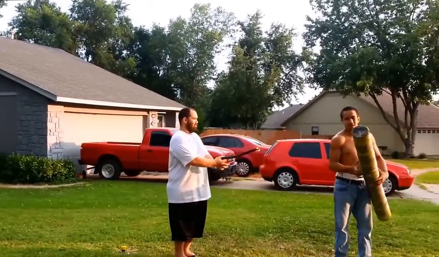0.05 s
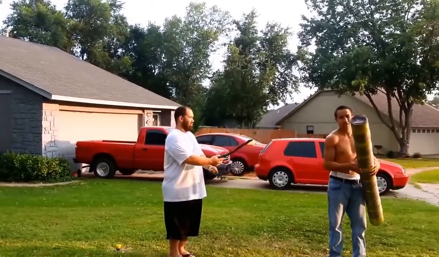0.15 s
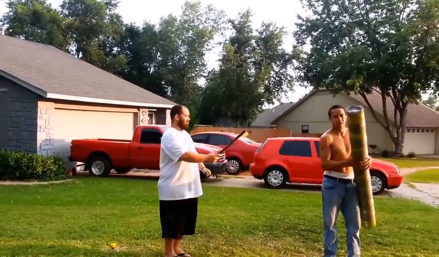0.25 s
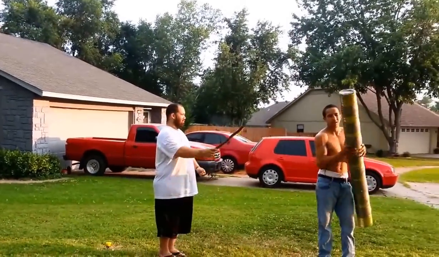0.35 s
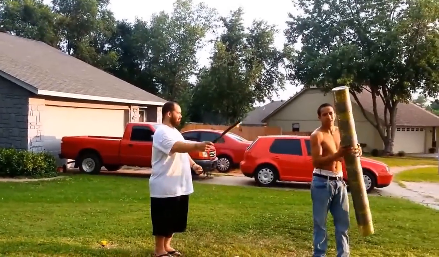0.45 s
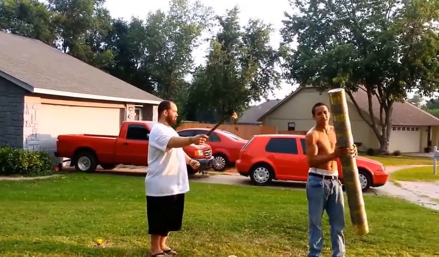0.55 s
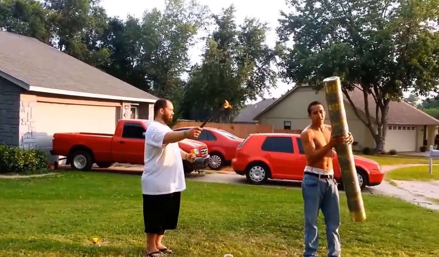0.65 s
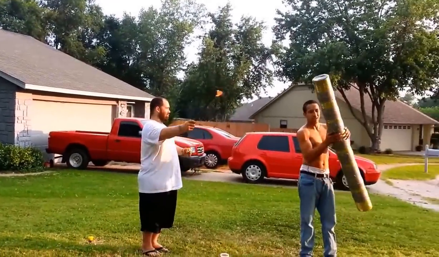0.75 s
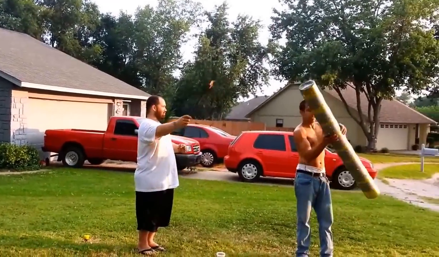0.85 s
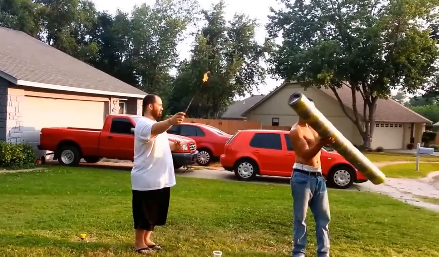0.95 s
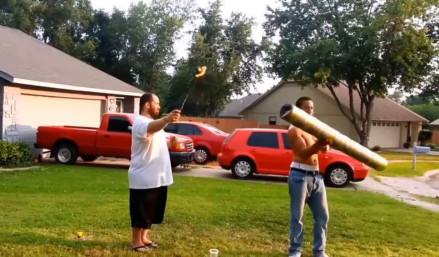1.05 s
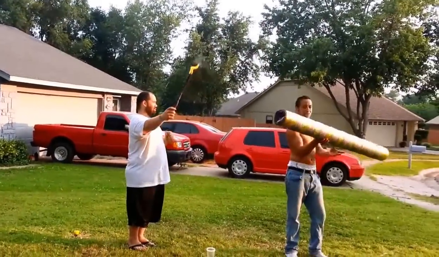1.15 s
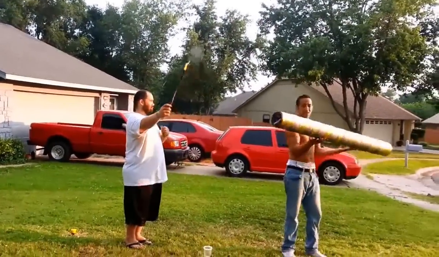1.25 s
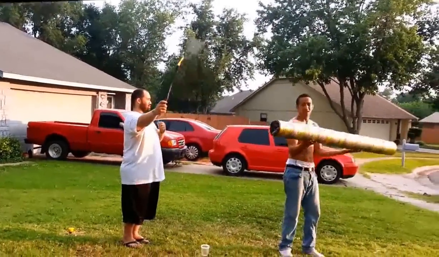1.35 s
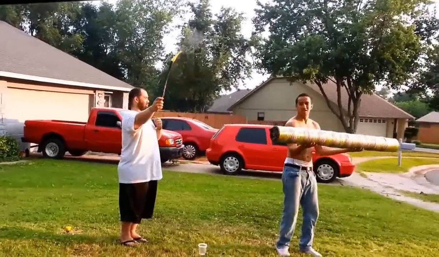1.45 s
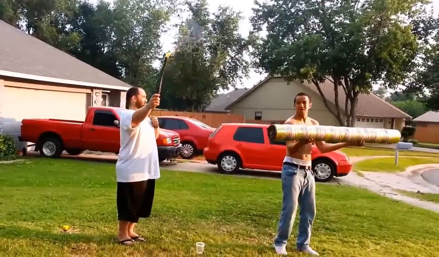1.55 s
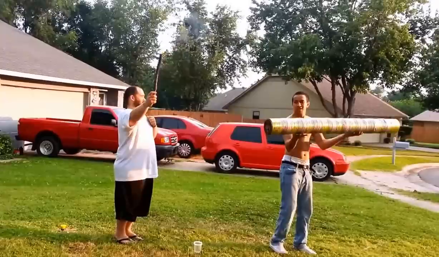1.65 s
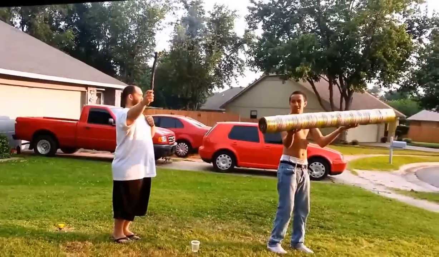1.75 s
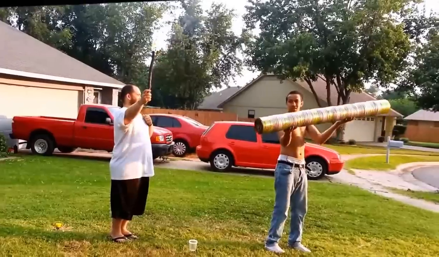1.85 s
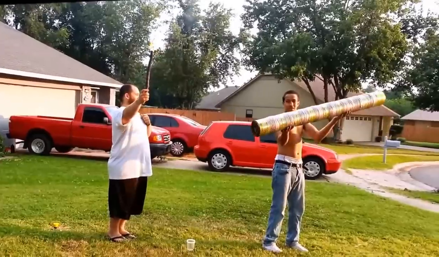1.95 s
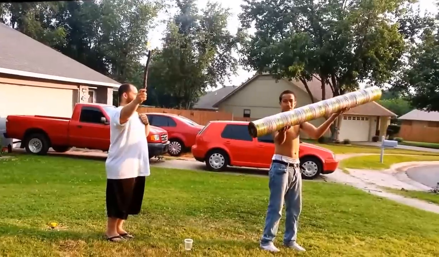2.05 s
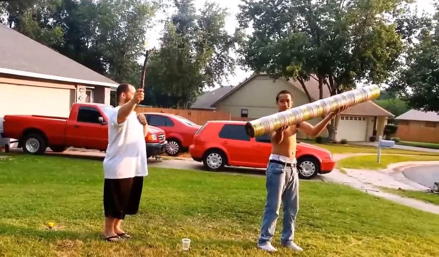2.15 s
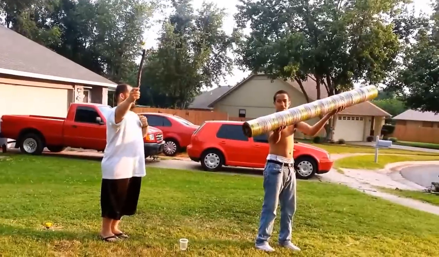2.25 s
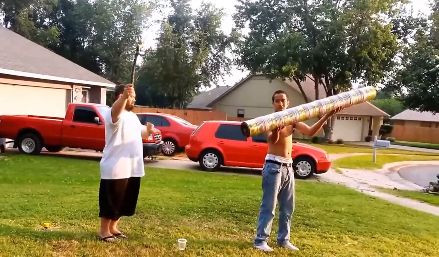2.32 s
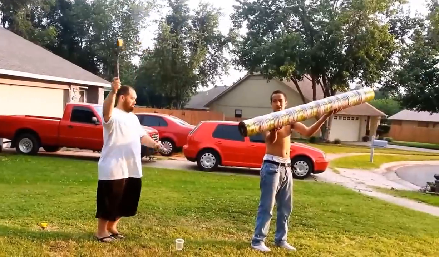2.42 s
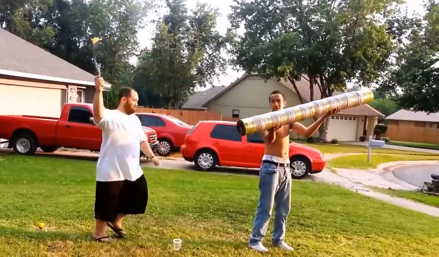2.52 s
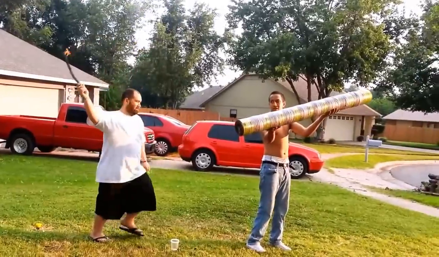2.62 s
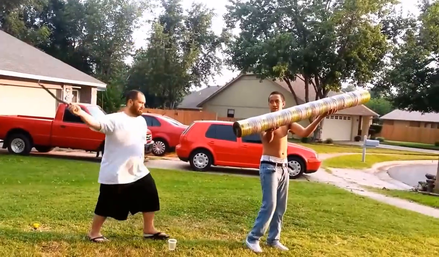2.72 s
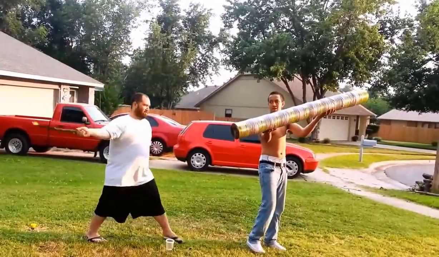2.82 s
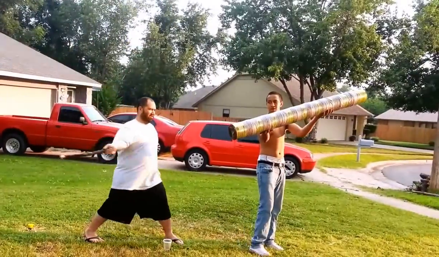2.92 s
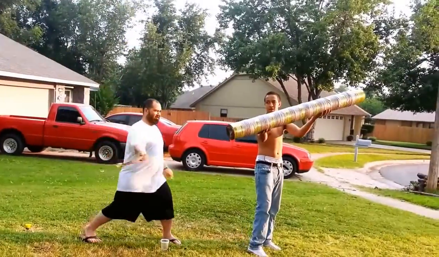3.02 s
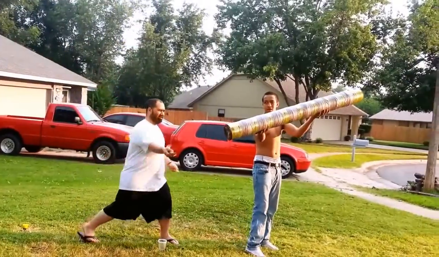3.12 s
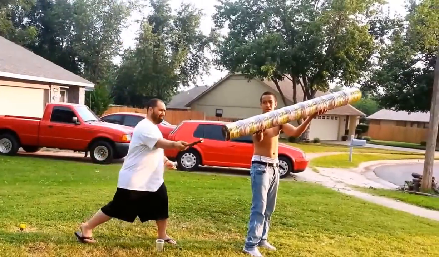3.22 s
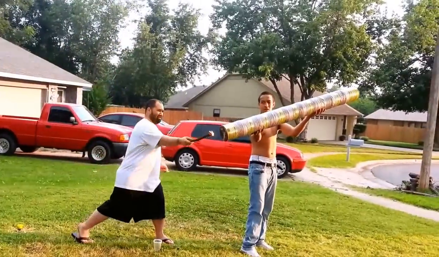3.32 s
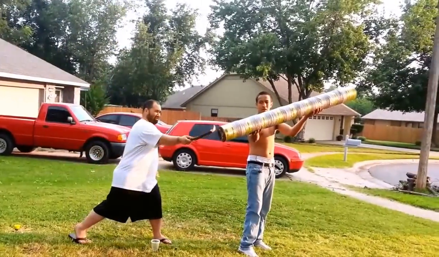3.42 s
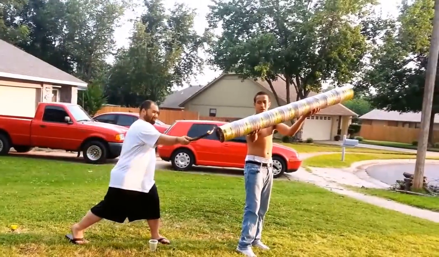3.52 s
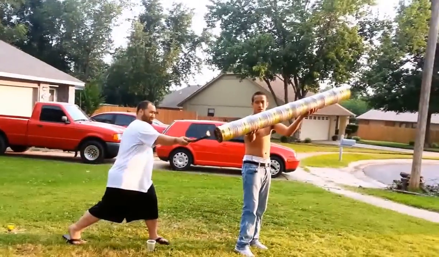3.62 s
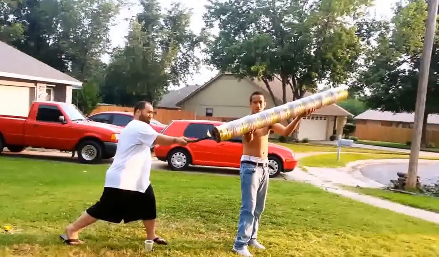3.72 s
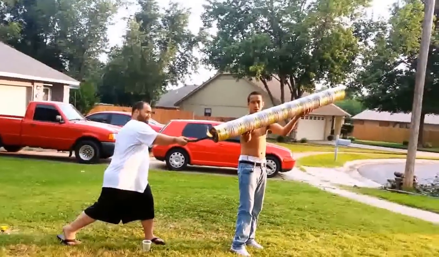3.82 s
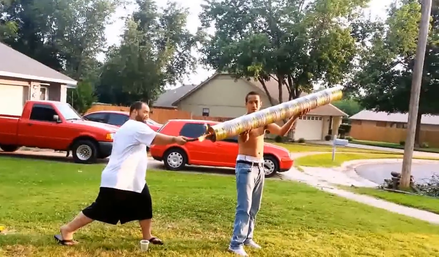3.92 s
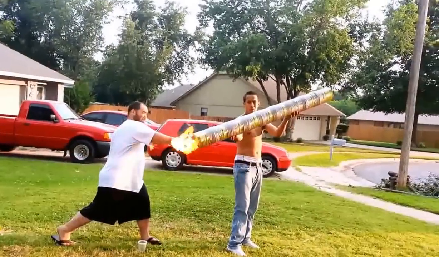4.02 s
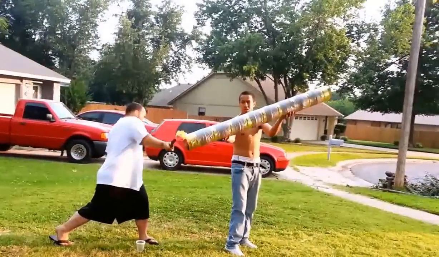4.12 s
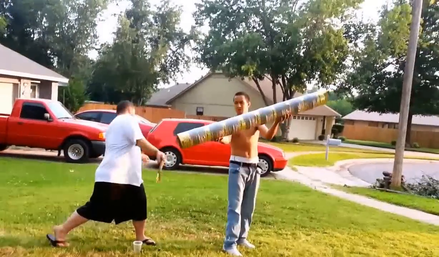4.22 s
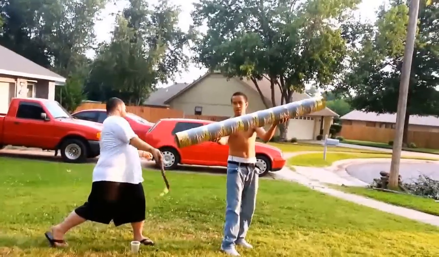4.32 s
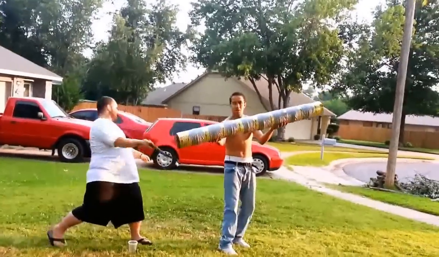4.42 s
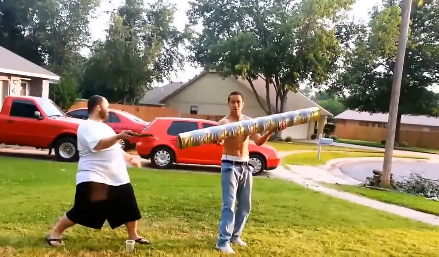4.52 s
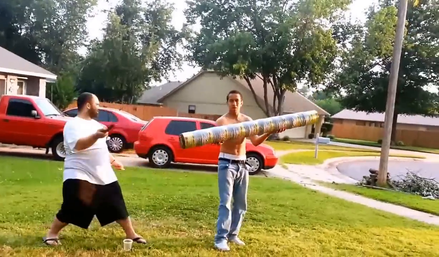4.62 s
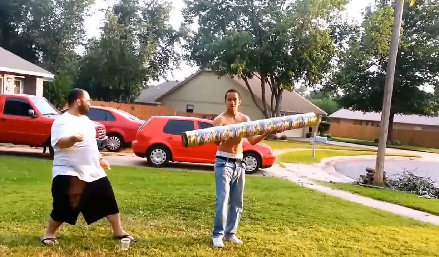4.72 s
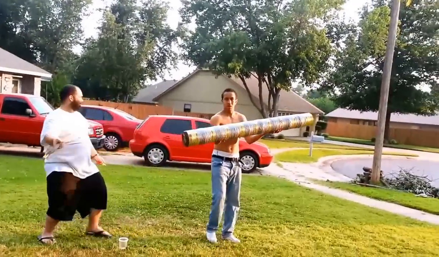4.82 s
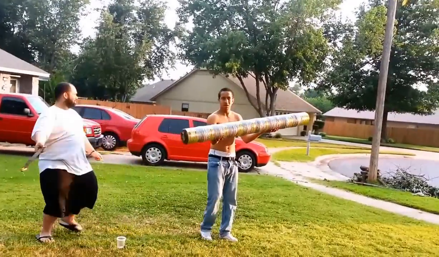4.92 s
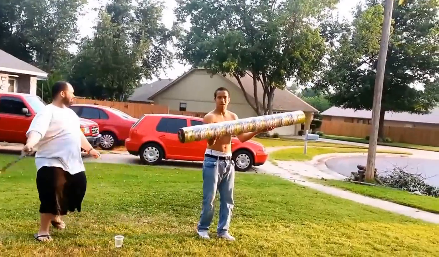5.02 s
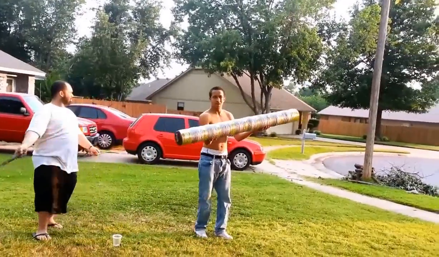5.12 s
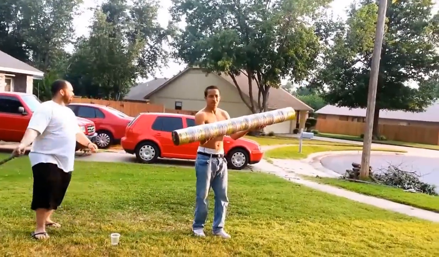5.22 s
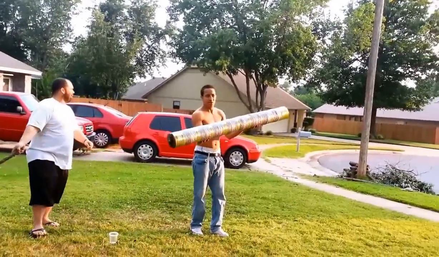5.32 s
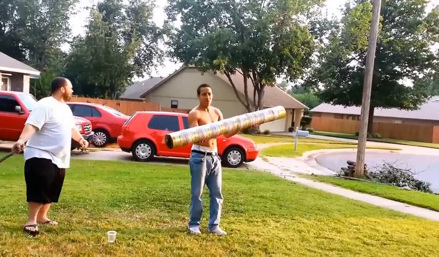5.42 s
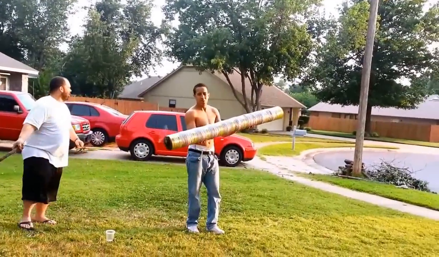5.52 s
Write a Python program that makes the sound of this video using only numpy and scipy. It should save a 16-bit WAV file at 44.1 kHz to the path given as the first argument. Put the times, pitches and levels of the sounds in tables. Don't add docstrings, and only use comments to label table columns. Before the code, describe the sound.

A camera microphone close to a tube cannon picks up steady insect song, leaf hiss and a lumpy distant engine drone. A lighter stick clicks twice, a bird squeals, a firecracker pops far off. The flame hisses for an instant, then a harsh clipped blast bursts out with crackling reflections from houses and fences, a distinct late slap with low thuds, and a quickly darkening tail; a bird squeals again.

```python
import sys
import numpy as np
from scipy import signal
from scipy.io import wavfile
from scipy.ndimage import uniform_filter1d, minimum_filter1d

SR = 44100
rng = np.random.default_rng(int(sys.argv[2]) if len(sys.argv) > 2 else 0)


def boost_factor(decibels):
    exponent = np.asarray(decibels, float) / 20
    return 10 ** exponent


def unload_wav(signal):
    wavfile.write(
        sys.argv[1],
        SR,
        np.round(np.clip(np.atleast_2d(signal).T, -1, 1) * 32767).astype(np.int16),
    )


N = 245135

# f/Hz, density/dB
AIR_COLOUR = [(330, -41), (560, -2.5), (1590, -5.5), (1980, -3.5), (2240, -8.5), (2610, -6), (3960, -9),
              (13400, -24.5), (14600, -27), (15400, -67)]
# f/Hz, density/dB
DRONE_COLOUR = [(15, -73), (25, -42), (43, -21), (76, -19.5), (130, -8), (172, -17), (206, 2), (246, -13.5),
                (280, -2.5), (540, -7), (700, -90), (1190, -120)]
# f/Hz, level/dB
SHAFT_ORDERS = [(106, -49), (141.5, -44), (212.5, -43.5)]
# f/Hz, width/Hz, level/dB, swing/dB (plus = first chorus, minus = second)
INSECT_BANDS = [(2006, 150, -51, 2), (2685, 62, -56, -3.5), (3580, 18, -54, 2), (3890, 310, -51, -0.5),
                (4210, 20, -62.5, -5.5), (6580, 1700, -54.5, 0.5)]
# t/s, level/dB, t60/s
STICK_CLICKS = [
    (0.197, -35.5, 0.2),
    (0.2296, -22, 0.023),
]
# f/Hz, width/Hz, level/dB
STICK_MODES = [(1800, 290, 4), (3900, 540, -1), (6740, 710, 2.5), (9000, 1500, -5), (12000, 2000, -18)]
# start t/s, glide/s, starting f/Hz, level/dB
BIRD_SQUEALS = [
    (1.25, .175, 890, -37.5),
    (5.19, .21, 928, -33.5),
]
PARTIAL_MULTIPLES = [4, 5, 6, 7, 7.5, 8, 9, 10, 11, 15]
PARTIAL_LEVELS = [
    [0, -20, -18, -13, -30, -15, -10, -23, -16, -14],
    [0, -29, -15, -22, -8, -8, -19, -20, -24, -28],
]
# t/s, signed peak, f/Hz
POP_PULSES = [(1.8752, -.25, 2300), (1.8758, 1.0, 700), (1.8805, .12, 340), (1.8836, -.17, 1900),
              (1.8961, -.22, 2200), (1.9032, .08, 1300), (1.9114, .4, 760), (1.9143, -.2, 660),
              (1.9216, -.1, 1500), (1.9295, .09, 1500), (1.9326, .2, 1600), (1.955, .06, 1900),
              (1.973, .05, 1900), (2.029, .06, 1500), (2.057, .05, 1200)]
# f/Hz, density/dB
POP_COLOUR = [(150, -8), (500, 3), (1200, 5), (2500, -1), (5000, -13), (8000, -24)]
# t/s, level/dB
YARD_RETURNS = [(3.975, -9), (4.15, -11), (4.3, -9), (4.43, -15), (4.52, -11), (4.6, -15), (4.88, -28.5),
                (5.18, -38.5)]
# f/Hz, density/dB
BLAST_COLOUR = [(30, -33), (90, 2), (180, 3.5), (350, -1), (600, -1), (1500, -2), (3000, -8.5),
                (6000, -8.5), (10000, -18), (16000, -24)]
# t/s, peak level/dB, f/Hz
HOUSE_BOOMS = [(4.01, 17.5, 410), (4.036, 10.5, 427), (4.068, 9.5, 354), (4.045, 6.5, 161), (4.22, -5, 170),
               (4.37, -4, 200), (4.478, 4, 200), (4.4874, -5, 387), (4.502, -3.5, 417)]
# t/s, peak level/dB, f/Hz
WALL_SLAPS = [
    (4.1053, 7, 1200),
    (4.1714, 23.5, 1290),
    (4.2473, 18, 2400),
    (4.3013, 13, 1120),
    (4.3574, 10.5, 1800),
    (4.524, 19.5, 1400),
]
# t/s, peak level/dB, f/Hz
FENCE_CRACKLES = [(4.127, 16.5, 970), (4.511, 13, 1550), (4.518, 4, 1890), (4.5417, 8.5, 1700),
                  (4.560, 12, 945), (4.577, -1, 1800), (4.5883, 12, 1580)]
# t/s, peak level/dB
TREBLE_GLINTS = [(4.1725, -14), (4.2485, -11), (4.3025, -3.5), (4.512, -16), (4.5255, -19), (4.542, -9.5)]
# t/s, signed peak, f/Hz
SLAP_THUDS = [
    (4.4585, -.8, 450),
    (4.4698, 1.6, 560),
    (4.4742, 1.5, 175),
    (4.493, 1.0, 300),
    (4.5035, .6, 330),
]
# f/Hz, level/dB
TREBLE_FLOOR = [(7000, -64), (8500, -52.5), (10000, -46.5), (11500, -43), (16000, -46.5)]
# t/s, level/dB, half length/s
CHANNEL_SPLITS = [
    (3.992, -12.5, 0.013),
    (4.079, -22, 0.012),
    (4.199, -24.5, 0.011),
    (4.232, -35, 0.021),
    (4.302, -46, 0.022),
]


def evened(x):
    return x / np.sqrt(np.mean(x ** 2) + 1e-20)


def read(points, hz):
    f, value = np.transpose(points)
    return np.interp(np.log(hz + 1), np.log(f + 1), value)


def octaves_above(hz, corner):
    return np.log2(np.maximum(hz / corner, 1))


def octaves_below(hz, corner):
    return np.log2(np.maximum(corner / (hz + 1), 1))


def add(mix, s, sound):
    part = mix[round(s * SR):][:len(sound)]
    part += sound[:len(part)]


def resonate(x, hz, width):
    turn = np.exp(2j * np.pi * hz * np.arange(len(x)) / SR)
    r = np.exp(-np.pi * width / SR)
    return 2 * (turn * signal.lfilter([1 - r], [1, -r], x / turn)).real


def noise_band(hz, width, size):
    once = resonate(rng.standard_normal(size), hz, width)
    return evened(resonate(once, hz, width))


def drift(per_s, size=N):
    span = int(SR / per_s)
    once = uniform_filter1d(rng.standard_normal(size), span)
    return evened(uniform_filter1d(once, span))


def noise(field_db, patchy_db, size=512):
    frames, hz = 4 * N // size + 5, np.fft.rfftfreq(size, 1 / SR)
    a, b, patches = rng.standard_normal((frames, len(hz), 3)).T
    patches = evened(uniform_filter1d(uniform_filter1d(patches, 6, 0), 10, 1))
    s = np.arange(frames) * size / 4 / SR
    z = (a + 1j * b) * boost_factor(field_db(hz[:, None], s) + patchy_db * patches)
    return evened(signal.istft(z, nperseg=size, noverlap=size * 3 // 4)[1][:N])


def burst(db, hz, share, t60):
    u = np.arange(6000) / SR
    rise = np.minimum(u / 0.0013, 1)
    return boost_factor(db - 60 * u / t60) * rise * noise_band(hz, share * hz, len(u))


def pressure_swings(events):
    stretch, front, wake = 1.75, .66, .9
    out, u = np.zeros(N), np.arange(-800, 1600) / SR
    for at, peak, hz in events:
        turns = stretch * np.log(np.maximum(1 + u * hz / stretch, 1e-3))
        hull = np.where(u < 0, (turns / front) ** 4, abs(turns / wake) ** 3)
        add(out, at + u[0], peak * np.cos(2 * np.pi * turns) * np.exp(-hull))
    return signal.lfilter(*signal.butter(2, 90, "high", fs=SR), out)


def neighbourhood():
    t = np.arange(N) / SR
    out = boost_factor(-40 + 0.27 * drift(3.1)) * noise(lambda hz, s: read(AIR_COLOUR, hz), 0.48)
    throb_db = 1.2 * drift(25) + .4 * drift(5)
    out += boost_factor(-39.5 + throb_db) * noise(lambda hz, s: read(DRONE_COLOUR, hz), 0.69, size=2048)
    for hz, db in SHAFT_ORDERS:
        wavering_t = t + 0.0031 * drift(0.45)
        out += boost_factor(db - 5 + 1.1 * drift(1.4)) * np.sin(2 * np.pi * hz * wavering_t)
    exchange_s, first_loudest_s = 5.65, -0.4
    chorus = np.tanh(2 * np.cos(2 * np.pi * (t - first_loudest_s) / exchange_s))
    for hz, width, db, swing_db in INSECT_BANDS:
        flutter_db = 0.24 * drift(5.0) + 0.7 * drift(42.4)
        out += boost_factor(db + swing_db * chorus + flutter_db) * noise_band(hz, width, N)
    return out


def lighter_stick():
    out, u = np.zeros(N), np.arange(3000) / SR
    for at, db, t60 in STICK_CLICKS:
        rattle = np.zeros(len(u))
        for hz, width, mode_db in STICK_MODES:
            rattle += boost_factor(mode_db) * evened(resonate(rng.standard_normal(len(u)), hz, width))
        add(out, at, boost_factor(db - 60 * u / t60) * np.minimum(u / 0.0022, 1) * evened(rattle))
    return out


def bird():
    rest_hz, break_s, edge_s = 838, .066, .025
    out = np.zeros(N)
    for (start, glide, top_hz, level_db), shares_db in zip(BIRD_SQUEALS, PARTIAL_LEVELS):
        t = np.arange(0, glide + break_s, 1 / SR)
        size = len(t)
        left = np.maximum(1 - t / glide, 0)
        broken = np.clip((t - glide) / edge_s + .5, 0, 1)
        hz = rest_hz + (top_hz - rest_hz) * left + 8 * broken
        unsteady = .006 * drift(150, size) + .025 * broken * drift(500, size)
        turns = np.cumsum(hz * (1 + unsteady)) / SR
        swell = boost_factor(level_db) * np.clip(np.minimum(t, t[-1] - t) / edge_s, 0, 1)
        rasp = noise_band(5500, 4300, size)
        add(out, start, swell * boost_factor(-11 - 6 * left) * rasp)
        for multiple, db in zip(PARTIAL_MULTIPLES, shares_db):
            flutter_db = 2 * drift(70, size) + .25 * multiple * drift(25, size)
            fade_db = -1.4 * (multiple - 5) * broken
            fade_db -= 50 * (multiple % 1) * (1 - left) ** 3
            fade_db -= 6 * left * max(2 - multiple / 6, 0)
            fade_db -= 9 * broken * (t - glide) / break_s
            fade_db += 16 * broken * (multiple == 5)
            add(out, start, swell * boost_factor(db + flutter_db + fade_db) * np.sin(2 * np.pi * multiple * turns))
    return out


def far_pop():
    since = np.arange(N) / SR - 1.877
    gather = np.clip(since / .04, 0, 1) ** .5
    fade = .8 * gather * boost_factor(-21.5 - 60 * np.maximum(since, 0) / 0.77 + 1.6 * drift(150))
    out = fade * noise(lambda hz, s: read(POP_COLOUR, hz), 1.7, size=256)
    add(out, 2.02, burst(-36, hz=1500, share=1.0, t60=.14))
    return out + pressure_swings(POP_PULSES)


def cannon():
    fire_s, dull_s = 3.9717, 4.57
    s, level_db = np.transpose(YARD_RETURNS)
    t = np.arange(N) / SR
    since = t - fire_s
    far_s = np.maximum(t - dull_s, 0)

    def bass_db(hz, s):
        return read(BLAST_COLOUR, hz) - 30 * octaves_above(hz, 330) - 9 * octaves_below(hz, 130)

    def body_db(hz, s):
        outside = np.maximum(hz / 3000, 1) * np.maximum(350 / (hz + 1), 1)
        return read(BLAST_COLOUR, hz) - 14 * np.log2(outside)

    def edge_db(hz, s):
        air_loss_db = 3.24 * hz / 1000 * np.clip(s - fire_s, 0, 1)
        return read(BLAST_COLOUR, hz) - 14 * octaves_below(hz, 3500) - air_loss_db

    returns = noise(body_db, 1.4)
    returns += boost_factor(-10.5 + 7 * far_s) * noise(bass_db, 2.4, size=1024)
    returns += boost_factor(-0.5 - 36 * far_s) * noise(edge_db, 0.43)
    clumps_db = 1.7 * drift(200)
    excess_db = 18 * boost_factor(-60 * np.maximum(since, 0) / .4)
    yard_db = np.interp(t, s, level_db) - 60 * np.maximum(t - s[-1], 0)
    shape = boost_factor(yard_db + excess_db + clumps_db) * (since >= 0)
    shape += boost_factor(-13) * np.exp(np.minimum(since, 0) / .0055) * (since < 0)
    return shape * returns


def walls():
    out = np.zeros(N)
    glints = [(at, db, 12000) for at, db in TREBLE_GLINTS]
    kinds = [(HOUSE_BOOMS, 0.72, .15), (WALL_SLAPS, 1.7, 0.018),
             (FENCE_CRACKLES, 0.41, 0.023), (glints, 0.59, 0.016)]
    for surfaces, share, t60 in kinds:
        for at, db, hz in surfaces:
            add(out, at, burst(db - 12, hz, share, t60))
    return out


def late_thuds():
    return pressure_swings(SLAP_THUDS)


def scene():
    mono = neighbourhood() + lighter_stick() + bird() + far_pop() + cannon() + walls() + late_thuds()
    return np.array([mono, mono])


def thinned(x):
    hz, t, z = signal.stft(x[0], SR, "cosine", 2048, 1024)
    fall_db = 2.5 * np.arange(len(t))
    power_db = 10 * np.log10((abs(z) ** 2).sum(0) + 1e-12)
    loud_db = np.maximum.accumulate(power_db + fall_db) - fall_db
    treble = signal.lfilter(*signal.butter(4, 10500, "high", fs=SR), x[0])
    top = uniform_filter1d(treble ** 2, 200)
    crest = -minimum_filter1d(-top, 2048) / (uniform_filter1d(top, 2048) + 1e-12)
    sharp = crest[np.minimum(np.arange(len(t)) * 1024, N - 1)] > boost_factor(2 * 7)
    masked_db = loud_db - 9 * sharp + read(TREBLE_FLOOR, hz)[:, None]
    least_db = np.maximum(-80.5, masked_db) + 1.2 * rng.standard_normal(len(t))
    keep = (abs(z) > boost_factor(least_db)) | (hz < 7500)[:, None]
    shelf = boost_factor(-9 * (hz > 14500))[:, None]
    return signal.istft(z * keep * shelf, SR, "cosine", 2048, 1024)[1][:N]


def low_pass(x):
    return signal.sosfilt(signal.butter(12, 15580, fs=SR, output="sos"), x)


def record(dry):
    capsule = signal.lfilter(*signal.butter(2, 30, "high", fs=SR), dry)
    clipped = np.clip(capsule, -.93, .93)
    coupled = thinned(signal.lfilter(*signal.butter(2, 35, "high", fs=SR), clipped))
    t = np.arange(N) / SR
    split = sum(boost_factor(db) * np.exp(-((t - at) / half) ** 2) for at, db, half in CHANNEL_SPLITS)
    apart = split * resonate(rng.standard_normal(N), 2500, 12000)
    return low_pass(coupled + apart * [[1], [-1]])


dry = scene()
out = record(dry)
unload_wav(out)
```